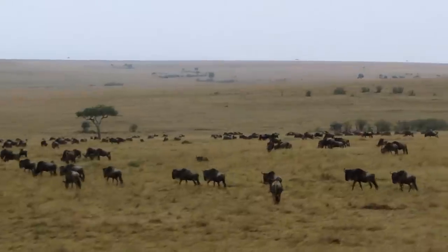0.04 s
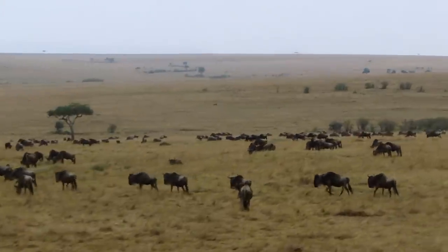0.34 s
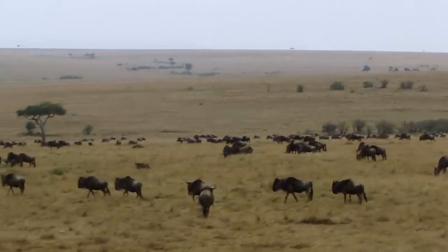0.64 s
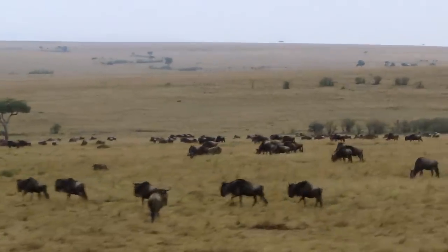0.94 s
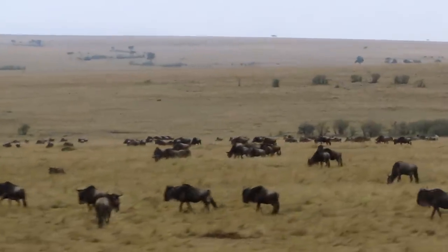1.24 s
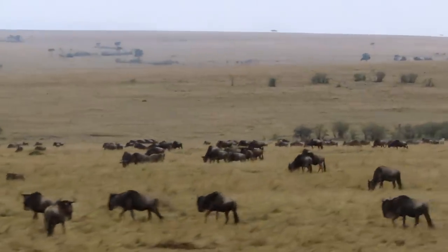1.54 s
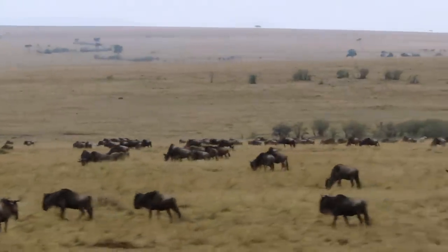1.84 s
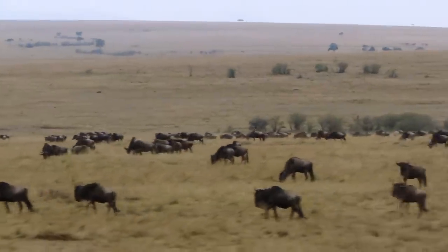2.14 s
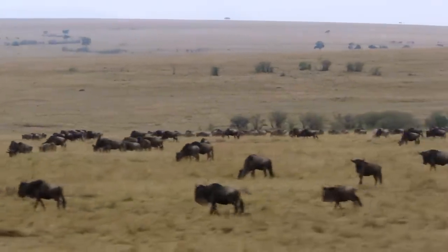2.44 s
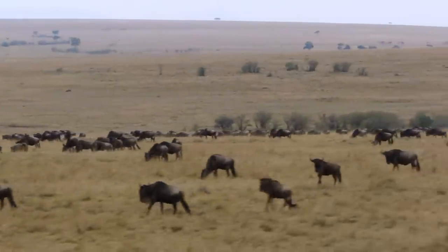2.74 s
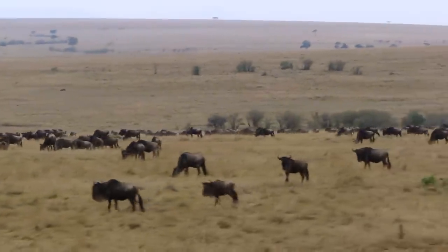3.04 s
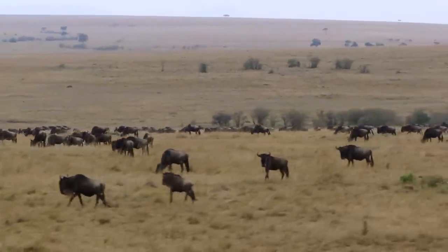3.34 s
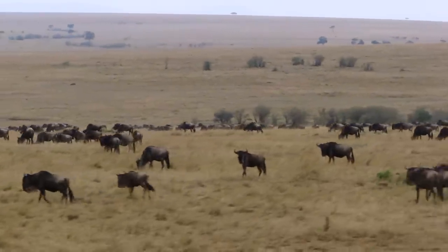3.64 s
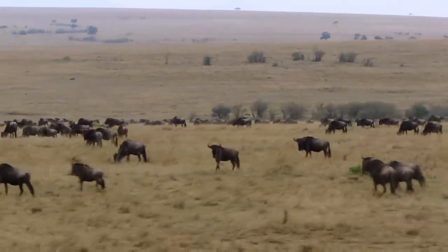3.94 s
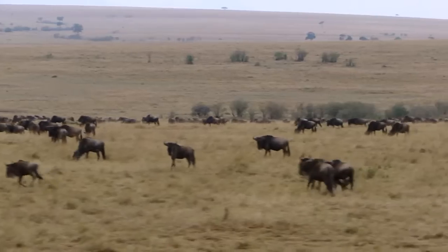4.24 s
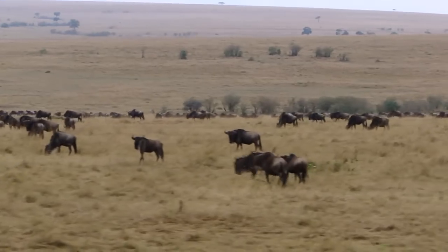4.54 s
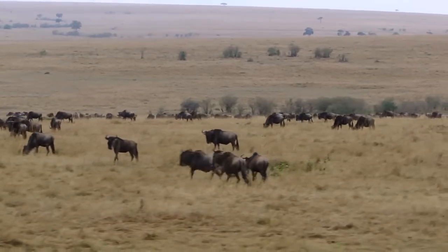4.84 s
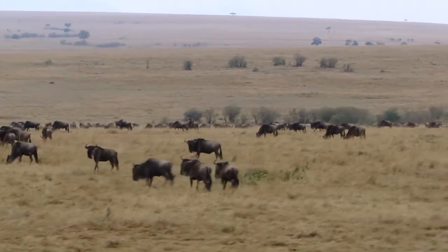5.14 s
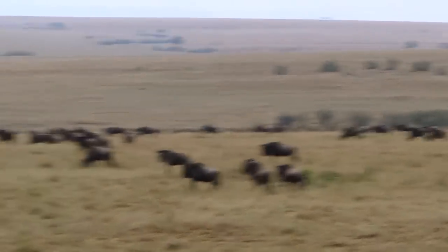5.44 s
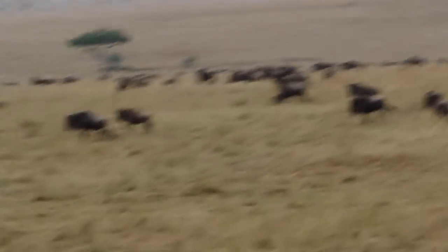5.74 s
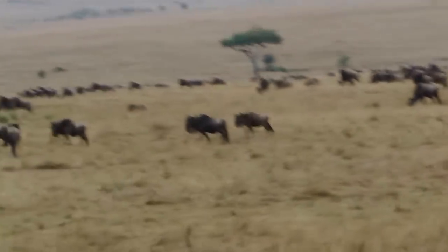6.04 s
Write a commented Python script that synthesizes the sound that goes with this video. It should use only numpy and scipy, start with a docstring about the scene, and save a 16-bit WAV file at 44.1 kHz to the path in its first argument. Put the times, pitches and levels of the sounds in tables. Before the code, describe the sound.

A loud, low gas flame roar from a balloon burner fades to a quiet hiss and fires up once more.

```python
"""A hot-air balloon's gas burner lights overhead with a thump and surges: turbulent combustion roars
under the rush and hiss of the gas jet, and the basket returns a short echo. From 1.4 s it is throttled
down; a flare goes off with a whump, and the flame leans aside and dies away. From about 3 s the pilot
flame sputters and excites the resonances of its tube, while hot metal ticks. At 4.9 s the burner fires
again. Two closely spaced microphone ports receive the sound."""
import sys
import numpy as np
from scipy import signal
from scipy.fft import rfft, irfft
from scipy.io import wavfile

SR = 44100
rng = np.random.default_rng(int(sys.argv[2]) if len(sys.argv) > 2 else 0)


def to_wav(s):
    """Save 16-bit WAV."""
    ch = np.atleast_2d(s).T  # columns
    pcm = np.round(np.clip(ch, -1, 1) * 32767)  # PCM
    wavfile.write(sys.argv[1], SR, pcm.astype(np.int16))


N = 269451
T, HZ = np.arange(N) / SR, np.fft.rfftfreq(N, 1 / SR)

# Valve openings: ignition t/s, delay until the jet catches/s, growth time/s, surge length/s,
# sag time/s, initial change of the deep rumble/dB
BLASTS = [(0.038, 0.038, 0.07, 0.45, 0.19, -5.5), (4.88, 0.056, 0.1, 0.42, 0.38, -10.5)]
# Uneven throttling of the first blast: t/s, flame level/dB, jet level/dB
THROTTLE = [(1.4, -0.5, 0.5), (1.64, -1.5, -3.5), (1.76, -3, -6), (1.87, -1, -5), (1.97, -1.5, -6),
            (2.12, -5, -10.5), (2.27, -4.5, -8.5), (2.43, -3.5, -6), (2.56, -8, -10.5), (2.8, -16, -15.5)]
# Bands in which roar, rush and hiss are normalised: lower f/Hz, upper f/Hz
BANDS = [(100, 1000), (1100, 2400), (4000, 12000)]
# Spectra of the upright and the leaning flame: f/Hz, relative spectral level/dB
UPRIGHT_SPECTRUM = [(18, -77), (30, -65), (69, -29), (104, -16.5), (140, -10), (177, -3.5), (240, 0),
                    (333, -1), (398, -0.5), (451, -2), (677, -1.5), (769, -4.5), (900, -7.5), (990, -7.5),
                    (1100, -15.5), (1490, -15), (2170, -21.5), (2590, -29), (8320, -44), (11300, -44),
                    (12800, -53), (16600, -80), (22000, -120)]
LEANING_SPECTRUM = [(18, -77), (30, -57), (69, -28), (121, -14.5), (177, -2.5), (217, -4), (246, 2.5),
                    (440, -5), (612, -3), (712, -1.5), (990, -10), (1100, -17.5), (1280, -13), (1730, -17),
                    (4090, -36.5), (11300, -44), (12800, -49), (16600, -81), (22000, -120)]
# Short hollow puffs of the flame, and one low knock at 3.33 s: t/s, nominal rise/dB, half-length/s
PUFFS = [(0.545, 3.5, 0.0071), (1.116, 3, 0.011), (1.536, 2, 0.0051), (1.58, 2, 0.005), (1.836, 2.5, 0.012),
         (2.06, 1.5, 0.012), (2.682, 3.5, 0.013), (2.962, 2.5, 0.011), (3.328, 3, 0.0025),
         (3.49, 5.5, 0.024), (5.13, 0.7, 0.046)]
# Spurts in the gas flow: t/s, change of rush and hiss/dB, half-length/s
SPURTS = [(0.11, 2, 0.012), (0.149, 3, 0.0075), (0.178, 2.5, 0.0056), (0.194, 4.5, 0.005),
          (0.262, 1, 0.005), (0.335, 2, 0.0053), (0.378, 3.5, 0.012), (0.406, 2.2, 0.012),
          (0.488, -1, 0.0062), (0.531, 3, 0.007), (0.59, 2, 0.007), (2.96, 1.5, 0.015), (4.47, 2.5, 0.023),
          (5.0, 1, .03), (5.257, 3, .01), (5.315, 3.5, 0.0073), (5.378, 2.5, .007), (5.415, 3.5, .018)]
# Gusts of fresh gas: t/s, level/dB, half-length/s
WHOOSHES = [(0.148, -29, 0.015), (1.91, -39, 0.062), (2.938, -46.5, 0.02), (5.02, -29, 0.033)]
# Spectrum of the pilot flame: f/Hz, relative spectral level/dB
PILOT_SPECTRUM = [(30, -40), (70, -26), (120, -10.5), (270, -3.5), (700, -1), (1000, -7), (1150, -9.5),
                  (1400, -10), (2050, -10), (2350, -15.5), (3000, -16), (3800, -16), (7500, -22),
                  (11300, -22), (12800, -33)]
# Resonances of the pilot's tube: f/Hz, bandwidth/Hz, relative gain/dB
TUBE_MODES = [(1330, 90, 9), (1483, 40, 5.5), (1823, 62, 9), (1940, 40, 6), (2136, 35, 9), (2500, 25, 5),
              (2730, 56, 7), (2900, 56, -4), (3146, 52, 6.5), (4430, 50, 5), (4660, 37, 5), (7590, 36, 1)]
# Spits of the pilot: t/s, relative peak level/dB
SPITS = [(2.929, -42), (3.18, -49), (3.325, -45.5), (3.36, -46.5), (3.465, -42), (3.522, -45),
         (3.644, -44.5), (3.735, -48), (3.8314, -42.5), (3.8681, -41.5), (3.9374, -40), (4.003, -41.5),
         (4.057, -38), (4.161, -42), (4.215, -44.5), (4.237, -40), (4.295, -44), (4.35, -41), (4.447, -39),
         (4.52, -44), (4.586, -46), (4.69, -43), (4.752, -42), (4.829, -38)]
# Brief tones of the tube: t/s, f/Hz, level/dB, half-length/s
TUBE_TONES = [(2.963, 1330, -45, 0.04), (3.46, 1330, -48.5, 0.08), (4.096, 1823, -50.5, 0.043),
              (4.25, 1820, -54, 0.032), (4.47, 1340, -53, 0.04), (4.55, 2140, -56, 0.06),
              (4.78, 2127, -56, 0.07)]
# Slips of hot metal: t/s, relative level/dB
METAL_SLIPS = [(3.2624, -23.5), (3.2647, -26), (3.271, -34)]
# Modes of the burner frame: f/Hz, relative level/dB, time to decay by 60 dB/s
FRAME_MODES = [(1740, -2, 0.022), (2480, -6, .03), (2650, -5.5, 0.027), (2860, -7, .025), (3250, -7, .022),
               (3900, -11, .025), (4500, -11, .02), (6200, -15, .012)]
# Phase of the left port relative to the right: f/Hz, phase/rad (negative is a lag)
PORT_PHASE = [(30, -.2), (300, -.3), (600, -.68), (850, -.9), (1130, -1.4), (1400, -1.2), (2100, -1.35),
              (2600, -1.95), (3200, -1.8), (4200, -2.05), (7400, -2.75), (10000, -3.15), (11600, -3.7),
              (12500, -3.2)]
# Level of the left port relative to the right: f/Hz, level/dB
PORT_BALANCE = [(30, -1), (350, -0.5), (550, -2), (980, -2), (1180, -6), (1650, -6), (2300, -4), (2850, -7),
                (4200, -5.5), (6500, -3.5), (10700, 1), (12500, 0)]
# Coherence between the ports for direct and for diffuse sound: f/Hz, coherence (0-1)
DIRECT_COHERENCE = [(30, 0.62), (100, 1), (300, 0.97), (900, 0.98), (1200, 0.96), (2100, 0.96),
                    (3200, 0.62), (12000, 0.63)]
DIFFUSE_COHERENCE = [(30, .3), (100, 0.97), (250, 1), (750, 0.91), (1150, 0.68), (2100, 1), (3200, 0.81),
                     (12000, 0.5)]


def burner(echo_s=0.00755, echo_gain=0.094, deep_hz=330, roar_top_hz=1060, hiss_from_hz=3000):
    """Turbulent flow noise: large eddies roar, smaller ones rush and the nozzle hisses."""
    basket = 1 + echo_gain * np.exp(-2j * np.pi * HZ * echo_s)  # one reflection: a comb filter
    upright = at_ports(UPRIGHT_SPECTRUM) * basket
    leaning = at_ports(LEANING_SPECTRUM, DIFFUSE_COHERENCE) * basket
    lean, deep_db = flame_shape()
    gains = sum(valve(*timing) for *timing, _ in BLASTS)
    filters = lowpass(roar_top_hz), lowpass(hiss_from_hz) - lowpass(roar_top_hz), 1 - lowpass(hiss_from_hz)
    layers = []
    for gain, response, band in zip(gains, filters, BANDS):
        direct = np.sqrt(1 - lean) * waveform(upright * response, *band)
        diffuse = np.sqrt(lean) * waveform(leaning * response, *band)
        layers.append(gain * (direct + diffuse))
    roar, rush, hiss = layers
    # the largest eddies need a full-grown flame
    roar += (amplitude(deep_db) - 1) * irfft(rfft(roar) * lowpass(deep_hz), N)
    # the same turbulence modulates all three layers; weights in dB
    flutter, crackle = eddies(8, 34), eddies(36, 150)
    spurt_db, puff_db = swells(SPURTS), swells(PUFFS)
    roar *= amplitude(-0.15 * flutter + 0.3 * crackle)
    rush *= amplitude(0.97 * flutter + 0.5 * crackle + spurt_db + 2.5 * lean + 0.25 * puff_db)
    hiss *= amplitude(0.5 * flutter + 0.32 * crackle + spurt_db)
    return roar + rush + hiss + gains[0] * puffs(puff_db)


def valve(start, delay_s, grow_s, surge_s, sag_s, steady_db=(-18.5, -30, -40.5), surge_db=(5.5, 2.5, 1.5)):
    """Gas flow sets the gains of roar, rush and hiss; gas stored in the coil adds an opening surge."""
    caught = start + delay_s
    # a small flame lights, the whole jet catches with a thump, then the flame fills out
    flame = 0.36 * ramp(start, 0.027) + 0.31 * ramp(caught, 0.006) + 0.33 * ramp(caught, grow_s / 2)
    growth = np.array([flame, ramp(start, grow_s) ** 0.86, ramp(start, 0.84 * grow_s) ** 0.8])
    surge = 1 - ramp(start + surge_s, sag_s)
    level_db = np.array(steady_db)[:, None] + np.outer(surge_db, surge)
    if start < THROTTLE[0][0]:
        level_db += throttling()
    return growth * amplitude(level_db)


def throttling(jet_share=0.76, decay_db_per_s=(9, 6, 22)):
    """Roar, rush and hiss fall with the flow (in dB), then decay as the gas in the coil burns off."""
    times, flame_levels, jet_levels = np.transpose(THROTTLE)
    flame_db, jet_db = np.interp(T, times, flame_levels), np.interp(T, times, jet_levels)
    rush_db = flame_db + jet_share * (jet_db - flame_db)
    since_shut = np.maximum(T - times[-1], 0)
    return np.array([flame_db, rush_db, jet_db]) - np.outer(decay_db_per_s, since_shut)


def flame_shape(grown_db=3.5, throttled_db=-4.5, build_s=0.47, lean_from_s=1.803, lean_to_s=2.63):
    """Flame geometry sets the spectrum: gives the share that leans and the deep rumble's gain in dB."""
    young_db = np.zeros(N)
    for start, *_, lack_db in BLASTS:
        young_db = np.where(T >= start, lack_db * np.exp(-abs(T - start) / build_s), young_db)
    # a flare throws the throttled flame aside, where it sounds thinner and more diffuse
    throttled = ramp(lean_from_s, 0.024) * (T < BLASTS[-1][0])
    lean = 0.07 + 0.85 * throttled * (1 - ramp(lean_to_s, 0.21))
    since_shut = np.maximum(T - THROTTLE[-1][0], 0)
    shrunk_db = throttled_db + 1.5 * since_shut  # the bass cut eases as the roar fades
    return lean, grown_db + young_db + shrunk_db * throttled


def puffs(rise_db, centre_hz=480, half_width_hz=205):
    """Incoherent sounds add in power: low noise bursts give hollow puffs and one knock over the roar."""
    hollow = waveform(at_ports(UPRIGHT_SPECTRUM) * bandpass(centre_hz, half_width_hz), *BANDS[0])
    return hollow * np.sqrt(abs(amplitude(rise_db) ** 2 - 1))


def whump(at_s=1.832, peak_db=-7, half_s=0.0075, hz=490, fall_hz_per_s=9000, left_db=-3, left_lead_s=15e-5):
    """Sudden expansion: a gas pocket ignites at once and radiates a few cycles of falling pitch."""
    t = T - at_s + np.c_[[left_lead_s, 0]]
    cycles = hz * t - fall_hz_per_s * t ** 2 / 2 + rng.random()
    envelope = amplitude(peak_db + np.c_[[left_db, 0]]) * np.exp(-0.5 * (t / half_s) ** 2)
    return envelope * np.sin(2 * np.pi * cycles)


def whooshes(centre_hz=2550, half_width_hz=650):
    """Jet noise: fresh gas tears past the nozzle in a breathy band above the roar."""
    breath = waveform(at_ports(UPRIGHT_SPECTRUM) * bandpass(centre_hz, half_width_hz))
    return breath * swells([(s, amplitude(db), half_s) for s, db, half_s in WHOOSHES])


def pilot(rumble_db=-45.5, hiss_db=-50, ring_db=1.5, recovery_db_per_s=3.5, full_s=4.7):
    """Forced resonance: above a small flame's rumble, the sputtering jet drives the modes of its tube."""
    low = lowpass(1110)
    rumble = waveform(at_ports(PILOT_SPECTRUM) * low, *BANDS[0])
    rumble *= amplitude(rumble_db + 0.8 * eddies(5, 40))
    jet = at_ports(PILOT_SPECTRUM) * (1 - low)
    tube = sum(amplitude(db) * resonance(hz, width) for hz, width, db in TUBE_MODES)
    ring = irfft(-1j * jet * tube, N)  # in quadrature with the jet, so their powers add
    ring *= amplitude(ring_db - 0.5 * ramp(full_s, 0.1))  # at full force the jet rings the tube less
    hiss = (irfft(jet, N) + ring) / irfft(jet.mean(0), N).std()
    # the first blast starves the jet, which recovers slowly
    starved_db = recovery_db_per_s * np.maximum(full_s - T, 0) * ramp(*BLASTS[0][:2])
    sputter_db = 0.5 * eddies(5.2, 39)
    return rumble + hiss * amplitude(hiss_db - starved_db + swells(SPURTS) + sputter_db)


def pilot_spits(gain_db=-12, rise_s=0.0025, decay_s=0.02):
    """Noise transients: each spit is a burst of brighter hiss with exponential rise and decay."""
    envelope = np.zeros(N)
    for s, db in SPITS:
        before, after = np.maximum(s - T, 0), np.maximum(T - s, 0)
        envelope += amplitude(db + gain_db) * np.exp(-before / rise_s - after / decay_s)
    return envelope * waveform(at_ports(PILOT_SPECTRUM) * (1 - lowpass(1300, order=4)), *BANDS[2])


def tube_tones(width_hz=70):
    """Lock-in: the pilot's jet briefly favours one mode of its tube, which swells and fades."""
    jet = at_ports(PILOT_SPECTRUM)
    return sum(waveform(jet * resonance(hz, width_hz)) * swells([(s, amplitude(db), half_s)])
               for s, hz, db, half_s in TUBE_TONES)


def metal_ticks(ring_db=-9, snap_db=-8, snap_s=0.0013, left_db=-3, left_lag_s=0.000097):
    """Stick-slip: hot metal jerks, and each snap excites the damped modes of the burner frame."""
    t = T[:SR // 5]
    ring = sum(amplitude(db - 60 * t / t60) * np.cos(2 * np.pi * hz * t) for hz, db, t60 in FRAME_MODES)
    ticks = np.zeros(N)
    for s, db in METAL_SLIPS:
        snap = rng.standard_normal(len(t)) * np.exp(-t / snap_s)
        ticks[round(s * SR):][:len(t)] += amplitude(db + ring_db) * ring + amplitude(db + snap_db) * snap
    right = signal.sosfilt(signal.butter(2, [600, 9000], "bandpass", fs=SR, output="sos"), ticks)
    left = amplitude(left_db) * np.interp(T - left_lag_s, T, right)
    return np.array([left, right])


def at_ports(spectrum, coherence=DIRECT_COHERENCE):
    """Partial coherence: noise spectra at two ports, the left one shaded and slightly delayed."""
    shared = np.clip(curve(coherence), 0, 1)
    transfer = amplitude(curve(PORT_BALANCE)) * np.exp(1j * curve(PORT_PHASE))
    right = white_spectrum()
    left = transfer * (shared * right + np.sqrt(1 - shared ** 2) * white_spectrum())
    sum_gain = np.sqrt(1 + abs(transfer) ** 2 + 2 * shared * transfer.real)  # of both ports added
    return np.array([left, right]) * amplitude(curve(spectrum)) / sum_gain


def waveform(pair, low_hz=0, high_hz=SR / 2):
    """Inverse Fourier transform of two spectra, scaled so that their mean has rms 1 within the band."""
    in_band = pair.mean(0) * (HZ > low_hz) * (HZ < high_hz)
    return irfft(pair, N) / irfft(in_band, N).std()


def eddies(slow_hz, fast_hz):
    """Turbulent fluctuation: random wavering between two rates, rms 1."""
    wavering = irfft(white_spectrum() * HZ / np.hypot(HZ, slow_hz) / (1 + (HZ / fast_hz) ** 2), N)
    return wavering / wavering.std()


def white_spectrum():
    """White noise: equal mean power at every frequency."""
    return rfft(rng.standard_normal(N))


def curve(points):
    """Interpolation of a table on a logarithmic frequency axis."""
    hz, values = np.transpose(points)
    return np.interp(np.log(HZ + 1), np.log(hz + 1), values)


def lowpass(edge_hz, order=8):
    """Low-pass response, half amplitude at the edge."""
    return 1 / (1 + (HZ / edge_hz) ** order)


def bandpass(centre_hz, half_width_hz):
    """Flat-topped band-pass response."""
    return 1 / (1 + ((HZ - centre_hz) / half_width_hz) ** 4)


def resonance(centre_hz, width_hz):
    """Lorentzian peak of one mode."""
    return 1 / (1 + (2 * (HZ - centre_hz) / width_hz) ** 2)


def ramp(start_s, length_s):
    """Linear rise from 0 to 1, then held."""
    return np.clip((T - start_s) / length_s, 0, 1)


def swells(rows):
    """Sum of Gaussian pulses; each half-length is a standard deviation."""
    return sum(height * np.exp(-0.5 * ((T - s) / half_s) ** 2) for s, height, half_s in rows)


def amplitude(db):
    """Amplitude ratio of a level in decibels."""
    return 10 ** (np.asarray(db) / 20)


def scene():
    """Superposition: the pressures from main flame, pilot and metal add at each port."""
    return burner() + whump() + whooshes() + pilot() + pilot_spits() + tube_tones() + metal_ticks()


def record(dry, low_cut_hz=42, ceiling=0.97, high_cut_hz=12750):
    """Band limiting and soft saturation: the deepest bass and top treble are cut, high peaks rounded."""
    trimmed = irfft(rfft(dry) * HZ / np.hypot(HZ, low_cut_hz), N)
    rounded = trimmed / (1 + (trimmed / ceiling) ** 8) ** (1 / 8)
    high_cut = signal.firwin(401, high_cut_hz, window=("kaiser", 9), fs=SR)
    return signal.oaconvolve(rounded, high_cut[None], "same", axes=1)


dry = scene()
out = record(dry)
to_wav(out)
```